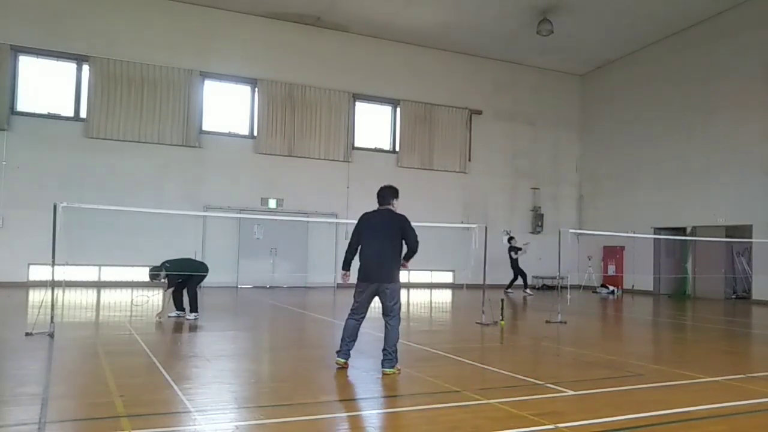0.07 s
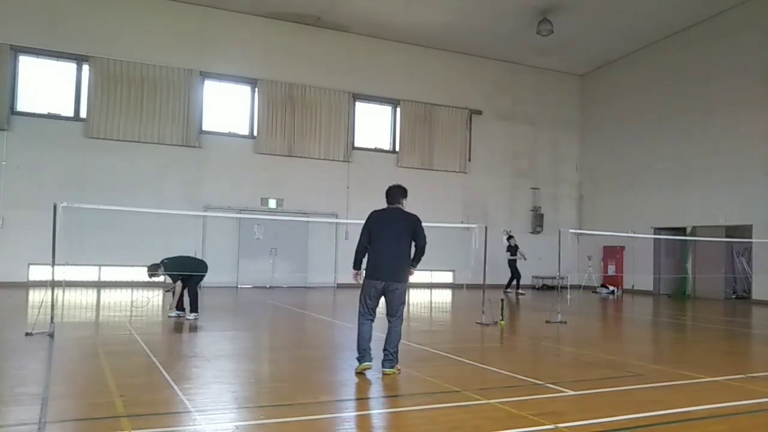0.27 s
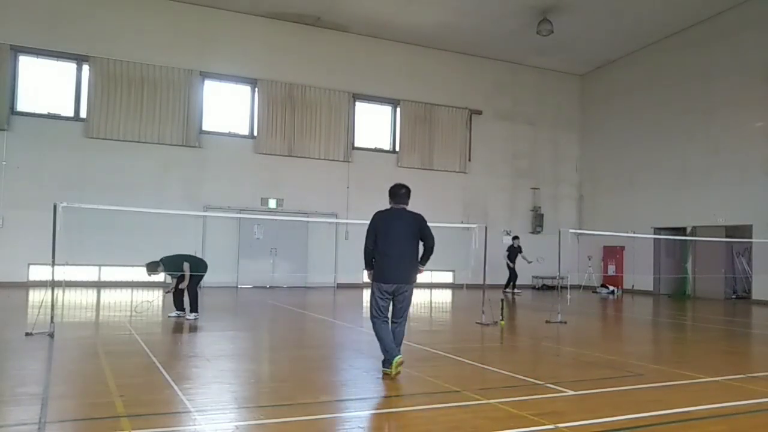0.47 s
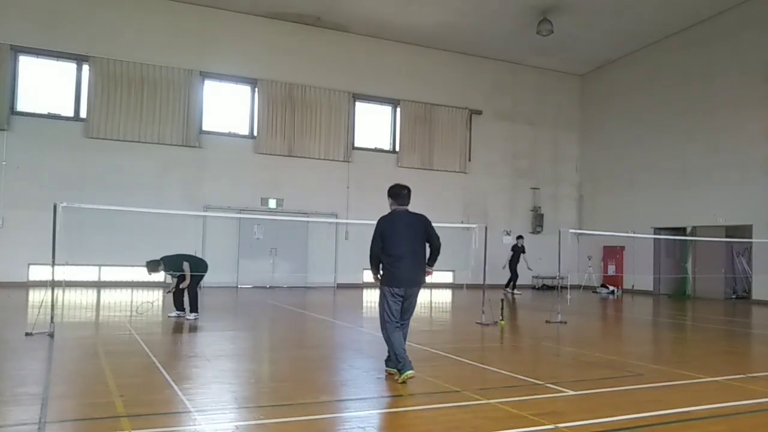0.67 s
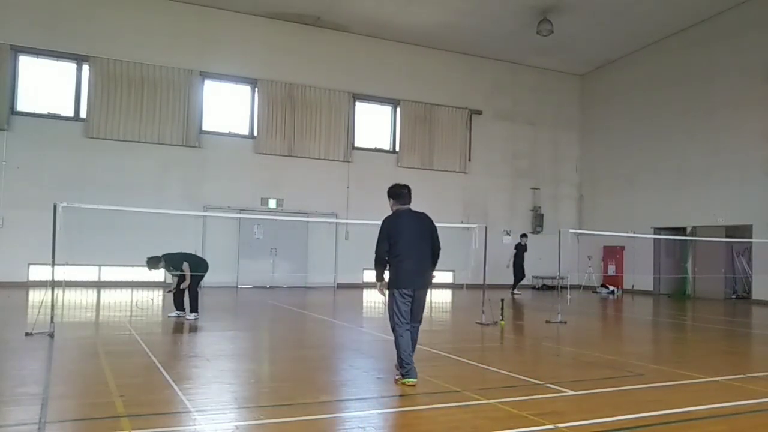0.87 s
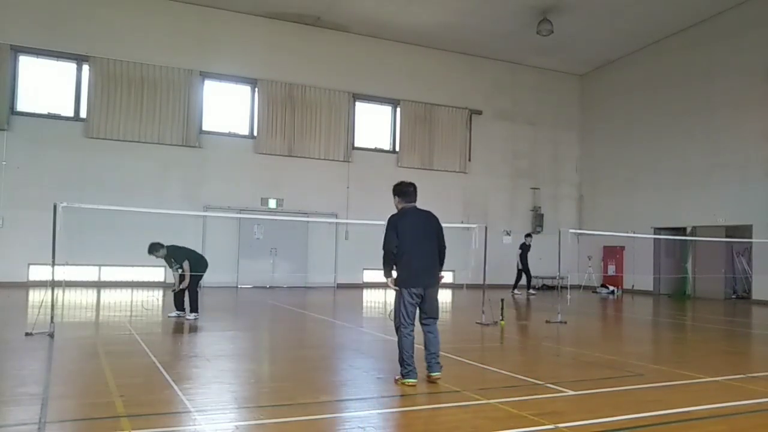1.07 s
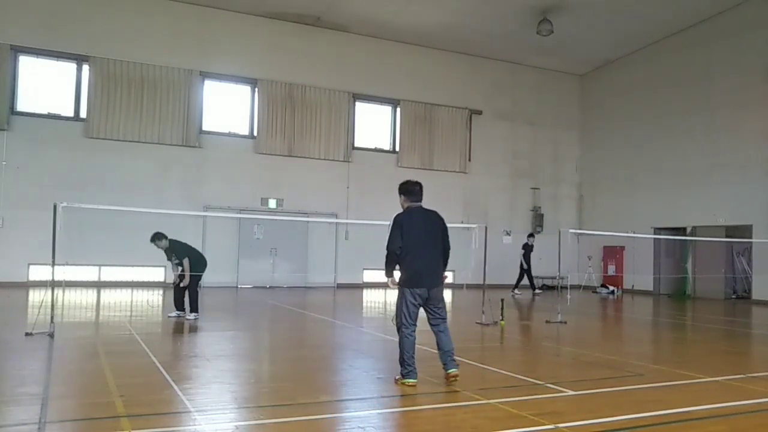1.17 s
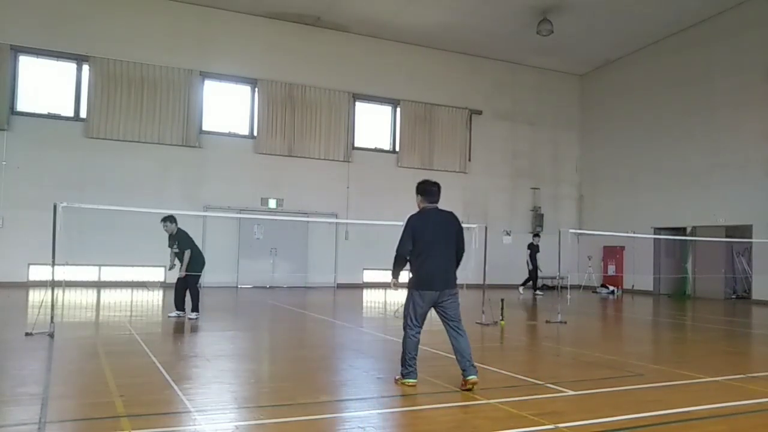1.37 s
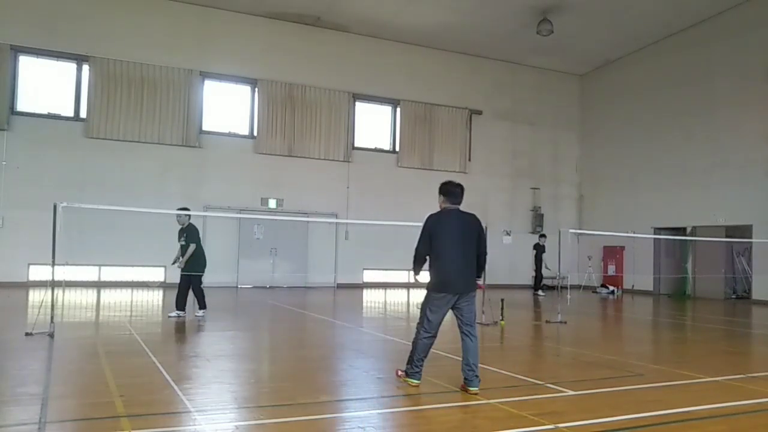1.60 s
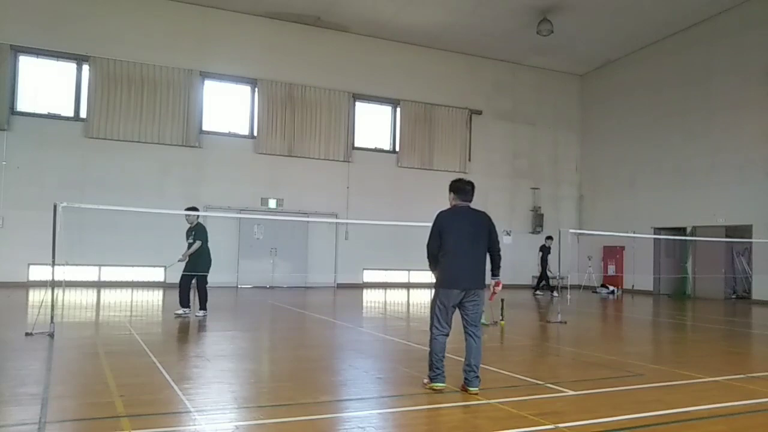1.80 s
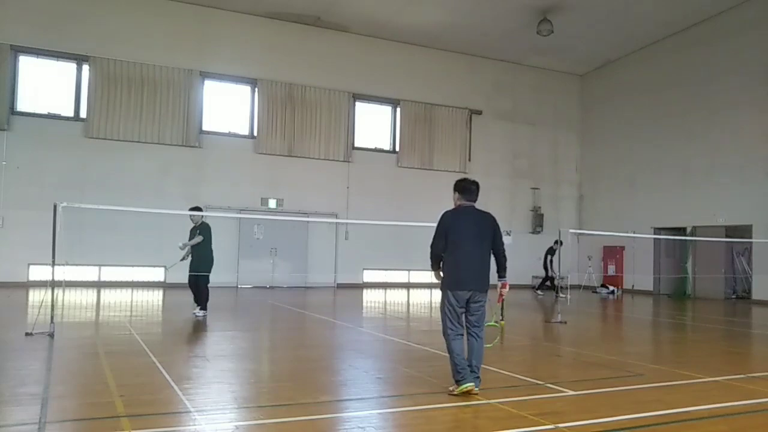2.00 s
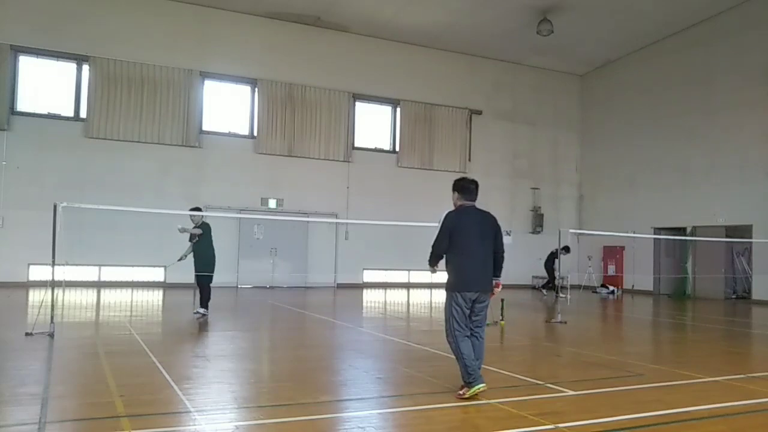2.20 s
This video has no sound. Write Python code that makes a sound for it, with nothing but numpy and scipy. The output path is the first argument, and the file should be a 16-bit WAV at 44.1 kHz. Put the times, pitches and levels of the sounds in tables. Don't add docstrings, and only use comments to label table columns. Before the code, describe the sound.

Sharp racket smack with a pinging string note, long hall reverberation, soft shoe thuds around it

```python
import sys
import numpy as np
from scipy import signal
from scipy.fft import rfft, irfft, next_fast_len
from scipy.io import wavfile
from scipy.ndimage import map_coordinates

SR = 44100
rng = np.random.default_rng(int(sys.argv[2]) if len(sys.argv) > 2 else 0)


def store_pcm(level_fs):
    pcm = np.round(np.clip(level_fs, -1, 1) * 32767).astype(np.int16)
    wavfile.write(sys.argv[1], SR, np.atleast_2d(pcm).T)


def rack_gain(trim_db):
    fader = np.asarray(trim_db, float)
    return 10 ** (fader / 20)


N = 99225

# [f/Hz, time to fall 60 dB/s]
HALL_DECAY = [(120, 1), (250, 1.49), (500, 1.5), (1000, 2.06), (2000, 2), (4000, 1.866), (6000, 1.82),
              (8000, 0.91)]
# [f/Hz, level/dB]
AIR_COLOUR = [(120, -19.5), (200, 8), (334, -0.5), (550, -2.5), (822, -6), (1010, -11), (1350, -16.5),
              (1930, -4), (4000, -13), (6500, -19.5), (8200, -21.5), (10700, -46.5)]
# [f/Hz, level/dB]
RUMBLE_COLOUR = [(16, -31.5), (32, 2.5), (62, 1), (90, -3.5), (125, -5.5), (180, -10.5), (260, -33),
                 (480, -94)]
# [t/s, level/dB]
RUMBLE_LEVEL = [
    (0.0, -49),
    (0.56, -56),
    (0.7, -53.5),
    (0.81, -59),
    (0.98, -55.5),
    (1.08, -59),
    (1.78, -58),
    (1.79, -47),
    (2.2, -55),
    (2.25, -53),
]
# [t/s, thump level/dB, board pitch f/Hz, hall answer level/dB]
FOOTSTEPS = [(.061, -37, 189.8, -62.5), (0.076, -48.5, 202.4, -65), (.096, -38.5, 111, -72),
             (.122, -42.5, 137.3, -54), (0.216, -43, 88.6, -49), (0.592, -49, 164.7, -60.5),
             (0.669, -46.5, 144.5, -59), (1.35, -51.5, 156, -59.5), (1.44, -43.5, 70.8, -62.5),
             (1.52, -49, 120, -56.5), (1.554, -46, 102, -58.5), (1.598, -45, 108, -55),
             (1.635, -41.5, 124, -57), (1.689, -47.5, 128, -63.5), (1.753, -45.5, 178.5, -53),
             (1.819, -43, 119, -50.5)]
# [f/Hz, level/dB]
STEP_TAIL_COLOUR = [(60, -8.5), (130, 2), (300, -2.5), (800, -5.5), (2000, -18.5), (4000, -27),
                    (8000, -37.5)]
# [t/s, peak level/dB, treble level/dB]
TAP_ARRIVALS = [(.8452, -51.5, 17), (1.438, -53, -0.5), (1.4415, -53, 3), (1.7740, -24.5, -5.5),
                (1.7922, -37.5, -1), (1.7972, -32.5, -4), (1.7986, -34, 2), (1.8102, -45.5, -9),
                (1.8385, -39, 6), (1.857, -46.5, 10.5), (1.892, -44.5, 2)]
# [f/Hz, width/Hz, level/dB]
TAP_BODY = [(292, 330, 6), (470, 260, 9.5), (1070, 250, 8.5), (1710, 280, -2), (2880, 820, -9),
            (5690, 590, -9.5), (7500, 1700, -15)]
# [f/Hz, level/dB]
TAP_TAIL_COLOUR = [(90, -24), (250, 2), (550, 1), (900, -2), (1600, -2), (2300, -14.5), (3600, -17),
                   (6400, -18.5), (8300, -23)]
# [t/s, peak level/dB, f/Hz, length/s]
PINGS = [(0.2415, -32, 997, 0.008), (.2535, -25, 1010, 0.0044), (0.276, -29, 927, .009),
         (0.293, -34, 1017, 0.022), (0.32, -38.5, 994, 0.011), (0.2379, -24, 1800, .0022),
         (.2395, -27, 260, .004), (0.2503, -34, 208.5, 0.008), (0.2655, -28, 1397, .003),
         (0.339, -32.5, 844, 0.011), (0.356, -32, 926, 0.005), (0.366, -29.5, 1022, 0.0046),
         (0.372, -33.5, 954, 0.0034), (0.383, -30, 1033, 0.008), (0.4, -34, 1015, .006),
         (0.41, -36, 1033, 0.011), (0.442, -43, 978, 0.012), (0.47, -41.5, 997, 0.013),
         (0.506, -46.5, 1037, .015), (.538, -42.5, 1007, .03), (0.576, -44.5, 1024, 0.033),
         (0.672, -50, 900, 0.035), (0.75, -47.5, 993, .015), (0.791, -46.5, 1007, 0.015),
         (0.999, -59, 1017, 0.031), (1.094, -59.5, 1027, 0.022), (0.061, -45.5, 900, 0.0027),
         (1.616, -57.5, 800, 0.028), (1.797, -38.5, 938, 0.0051), (1.8, -38.5, 316, 0.0019),
         (1.7731, -36.5, 500, 0.0049), (1.781, -46.5, 209, 0.014), (1.792, -46.5, 3260, 0.00093),
         (1.797, -55, 6110, 0.00073), (1.842, -50, 820, 0.014), (1.879, -48.5, 900, 0.012),
         (1.809, -49, 1750, .004), (1.84, -50, 560, .025), (.062, -47, 280, .03),
         (1.909, -54, 1490, 0.0063), (1.93, -49, 1527, 0.01), (1.939, -47.5, 1554, 0.0053),
         (2.013, -52.5, 1740, 0.0063), (1.814, -50.5, 260, .025), (1.801, -47.5, 416, 0.011),
         (1.362, -63, 260, 0.036), (2.209, -59, 1507, 0.012), (1.885, -57, 3500, 0.0023),
         (1.889, -57, 3340, 0.0033), (1.853, -51.5, 317.3, 0.034)]
# [t/s, peak level/dB, treble level/dB]
SMASH_ARRIVALS = [(.2382, -22.5, -4), (.2395, -16, -3), (.2415, -22.5, -11), (.2503, -20, -6),
                  (.2525, -29, 1.5), (.2545, -15.5, -7), (.2572, -27, 0), (.2615, -24, 2.5),
                  (.2662, -21, -4), (.2705, -20.5, 4), (.287, -26, -11), (.292, -26, -7.5), (.333, -28, -7),
                  (.339, -33, 2.5), (.3945, -41.5, 13), (.444, -36, 9)]
# [f/Hz, width/Hz, level/dB]
RACKET_BODY = [(198, 54, 0), (260, 170, 4), (500, 520, 3.5), (900, 45, 1), (1025, 51, 8), (1360, 520, 3.5),
               (2020, 410, 0), (2830, 400, -2.5), (6270, 1120, -8.5)]
# [f/Hz, level/dB]
SMASH_TAIL_COLOUR = [(110, -21.5), (220, -2.5), (600, 1), (1300, -2.5), (3100, -7), (3600, -13.5),
                     (6500, -18), (8300, -31)]
# [f/Hz, width/Hz, level over the colour/dB]
STRING_PEAKS = [(868, 79, 2.5), (1005, 55, -1.5), (1483, 65, -2.5), (2012, 36, -1)]
# [near level/dB, time for near part to fall 30 dB/s, far level/dB, far delay/s]
SMASH_HALL = (-32, 0.34, -35, 0.13)
# [f/Hz, level/dB]
FEATHER_COLOUR = [(1200, -29), (2200, 2), (3200, -0.5), (3900, -4), (5000, 2), (6500, -0.5), (7500, -9.5),
                  (8400, -4)]
# [f/Hz, level/dB]
MIC_RESPONSE = [(26, -53.5), (30, -8.5), (34, 1), (40, 1.5), (6600, 1.5), (7800, -7.5), (8250, -24),
                (8450, -24.5), (8550, -90)]

HIT_S = SMASH_ARRIVALS[0][0]


def unit(x):
    return x / np.sqrt(np.mean(x ** 2) + 1e-20)


def along(points, hz):
    f, v = np.transpose(points)
    return np.interp(np.log(hz + 1), np.log(f + 1), v)


def filtered(x, response):
    m = next_fast_len(N + SR // 2)
    spectrum = rfft(x, m) * response(np.fft.rfftfreq(m, 1 / SR))
    return irfft(spectrum, m)[:N]


def colouring(points):
    return lambda hz: rack_gain(along(points, hz))


def noise(points):
    return unit(filtered(rng.standard_normal(N), colouring(points)))


def resonances(peaks):
    def response(f):
        total = 0
        for k, (centre, width, db) in enumerate(peaks):
            damping = 1j * f * width
            total = total + (-1) ** k * rack_gain(db) * damping / (centre ** 2 - f ** 2 + damping)
        return total
    return response


def tail(response):
    start = unit(filtered(rng.standard_normal(N), response))
    hz, t, z = signal.stft(start, SR, nperseg=512)
    decay = rack_gain(-60 * t / along(HALL_DECAY, hz)[:, None])
    return signal.istft(z * decay, SR, nperseg=512)[1][:N]


def answer(start_s, response, near_db, near_s, far_db, far_s):
    t = np.arange(N) / SR
    near = rack_gain(near_db - 30 * t / near_s) * (1 - np.exp(-t / 0.0016))
    far = rack_gain(far_db) / (1 + np.exp(np.clip((far_s - t) / 0.011, -50, 50)))
    return np.pad((near + far) * tail(response), (round(start_s * SR), 0))[:N]


def arrivals(rows, body):
    scatter_s, scatter_db, treble_hz = .004, -8, 2300
    low, high = np.zeros(N + SR), np.zeros(N + SR)
    t = np.arange(SR // 50) / SR
    fade = rack_gain(scatter_db - 60 * t / (3 * scatter_s)) / np.sqrt(scatter_s * SR / 5)
    pushes = rng.standard_normal((len(rows), len(t))) * fade
    pushes[:, 0] = 1
    for (s, db, treble_db), push in zip(rows, pushes):
        i = round(s * SR)
        low[i:i + len(t)] += rack_gain(db) * push
        high[i:i + len(t)] += rack_gain(db) * (rack_gain(treble_db) - 1) * push
    treble = filtered(high[:N], lambda f: (1j * f / (treble_hz + 1j * f)) ** 2)
    ring = resonances(body)
    peak = np.abs(irfft(ring(np.fft.rfftfreq(8192, 1 / SR)))).max()
    return filtered(low[:N] + treble, ring) / peak


def air():
    rumble_db = np.interp(np.arange(N) / SR, *np.transpose(RUMBLE_LEVEL))
    return rack_gain(-67) * noise(AIR_COLOUR) + rack_gain(rumble_db) * noise(RUMBLE_COLOUR)


def steps():
    board_t60_s, sole_hz, sole_db = 0.087, 800, -18
    room_db, earlier_db = -2.5, -55.5
    direct, kicks = np.zeros(N + SR), np.zeros(N)
    t = np.arange(SR // 5) / SR
    grits = rng.standard_normal((len(FOOTSTEPS), len(t)))
    sole_filter = [1, -1.9 * np.cos(2 * np.pi * sole_hz / SR), .91]
    for (s, db, hz, answer_db), grit in zip(FOOTSTEPS, grits):
        i = round(s * SR)
        onset = rack_gain(db) * (1 - np.exp(-t / 0.00029))
        overtone = 0.54 * np.sin(2 * np.pi * 1.82 * hz * t) * rack_gain(-60 * t / 0.15)
        board = (np.sin(2 * np.pi * hz * t) + overtone) * rack_gain(-60 * t / board_t60_s)
        sole = unit(signal.lfilter([1, 0, -1], sole_filter, grit)) * rack_gain(sole_db - 60 * t / 0.032)
        direct[i:i + len(t)] += onset * (board + sole)
        kicks[i] = rack_gain(answer_db + room_db)
    colour = colouring(STEP_TAIL_COLOUR)
    late_tail = np.pad(tail(colour), (SR // 100, 0))
    room = signal.fftconvolve(kicks, late_tail)[:N]
    return direct[:N] + room + rack_gain(earlier_db) * tail(colour)


def tap():
    hall = answer(1.776, colouring(TAP_TAIL_COLOUR), near_db=-46, near_s=.5, far_db=-49.5, far_s=0.11)
    return arrivals(TAP_ARRIVALS, TAP_BODY) + hall


def pings():
    roughness = .45
    edge_cycles, flutter_swing_db = 1.5, 1
    out, t = np.zeros(N + SR), np.arange(SR // 10) / SR
    drifts = np.cumsum(rng.standard_normal((len(PINGS), len(t))), axis=1) * roughness / np.sqrt(SR / 100)
    knots = rng.standard_normal((len(PINGS), 40))
    for (s, db, hz, length), drift, knot in zip(PINGS, drifts, knots):
        i = round(s * SR)
        edge = edge_cycles / max(hz, 500)
        swell = 1 - np.exp(-t / edge)
        fade = np.exp(-np.clip(t - length, 0, 1) / (2 * edge))
        flutter_db = flutter_swing_db * map_coordinates(knot, [t * 300])
        note = np.sin(2 * np.pi * hz * t + drift * np.sqrt(hz / 1000))
        out[i:i + len(t)] += rack_gain(db + flutter_db) * swell * fade * note
    return out[:N]


def singing():
    pitch_hz, level_db, t60_s, delay_s = 1017, -42, 1.75, 0.11
    wander_rad, beat_swing_db = .8, 3
    t = np.arange(N) / SR - HIT_S - delay_s
    wander = np.cumsum(rng.standard_normal(N)) * wander_rad / np.sqrt(SR / 100)
    beat_db = beat_swing_db * map_coordinates(rng.standard_normal(120), [np.arange(N) * 45 / SR])
    swell = 1 - np.exp(-np.clip(t, 0, 9) / .02)
    level = rack_gain(level_db + beat_db - 60 * t / t60_s)
    return swell * level * np.sin(2 * np.pi * pitch_hz * t + wander)


def feather_skirt():
    level_db, hold_s, t60_s = -39.5, 0.011, 0.84
    t = np.arange(N) / SR - HIT_S
    fade = rack_gain(level_db - 60 * np.clip(t - hold_s, 0, 9) / t60_s)
    return (t > 0) * fade * noise(FEATHER_COLOUR)


def string_tail_colour(f):
    peaks = 1
    for centre, width, db in STRING_PEAKS:
        peaks = peaks + rack_gain(db) * width ** 2 / (4 * (f - centre) ** 2 + width ** 2)
    return rack_gain(along(SMASH_TAIL_COLOUR, f)) * peaks


def smash():
    hall = answer(HIT_S, string_tail_colour, *SMASH_HALL)
    return arrivals(SMASH_ARRIVALS, RACKET_BODY) + feather_skirt() + hall


def scene():
    return (air() + steps() + tap() + pings() + singing() + smash())[None]


def low_pass(x):
    return signal.sosfilt(signal.butter(12, 8400, fs=SR, output="sos"), x)


def record(dry):
    heard = filtered(dry[0], colouring(MIC_RESPONSE))
    mix = heard + rack_gain(-93.5) * rng.standard_normal(N)
    return low_pass(mix[None])


dry = scene()
out = record(dry)
store_pcm(out)
```